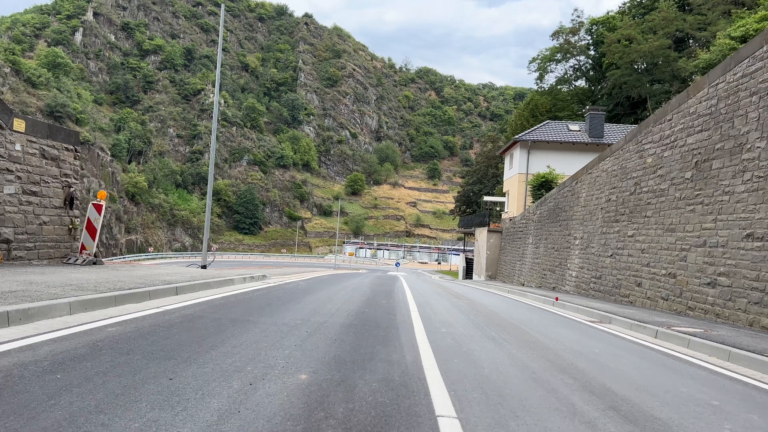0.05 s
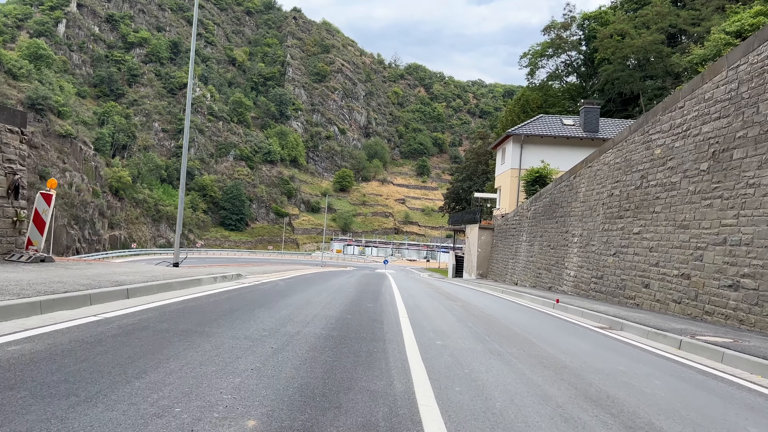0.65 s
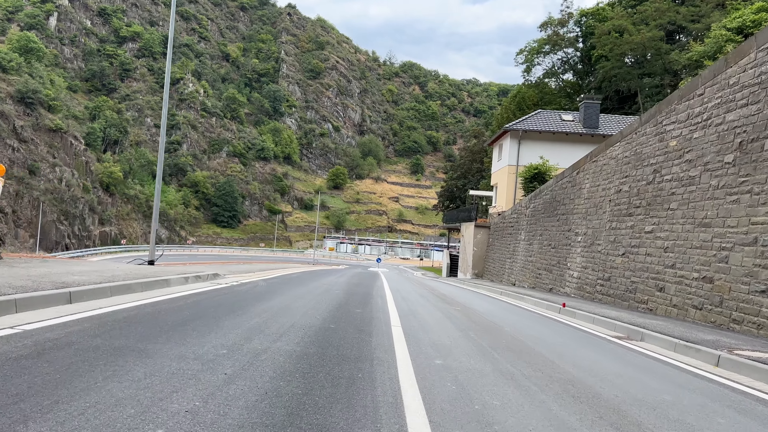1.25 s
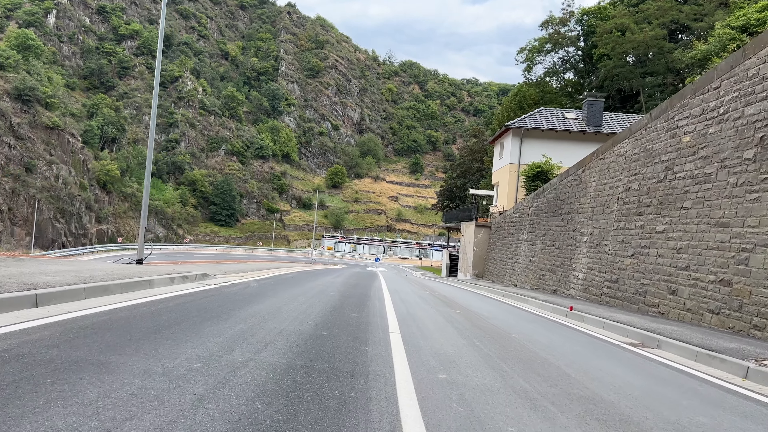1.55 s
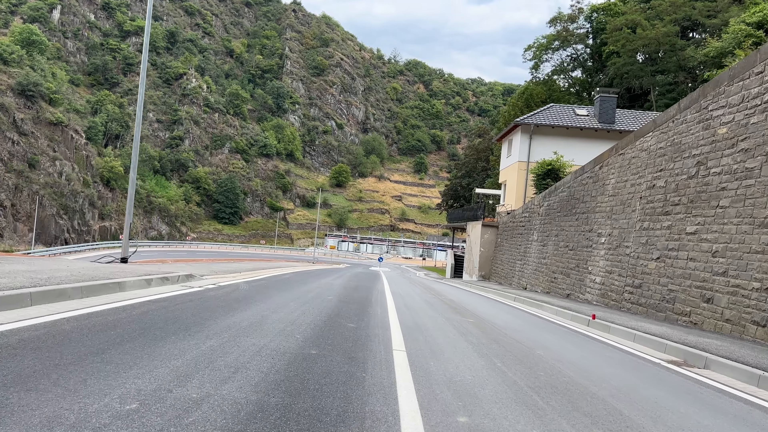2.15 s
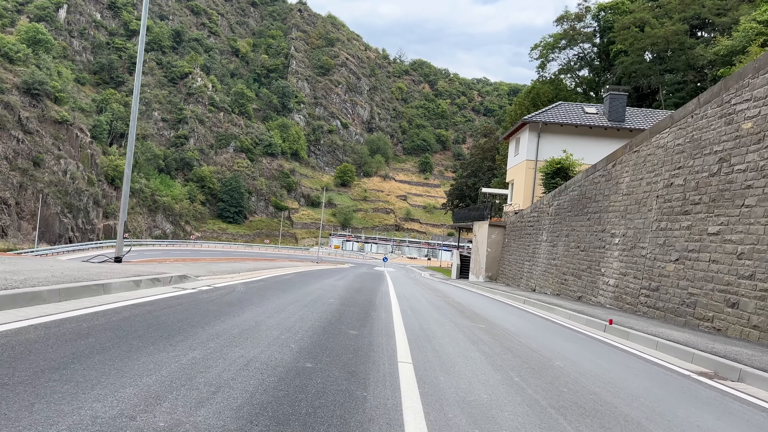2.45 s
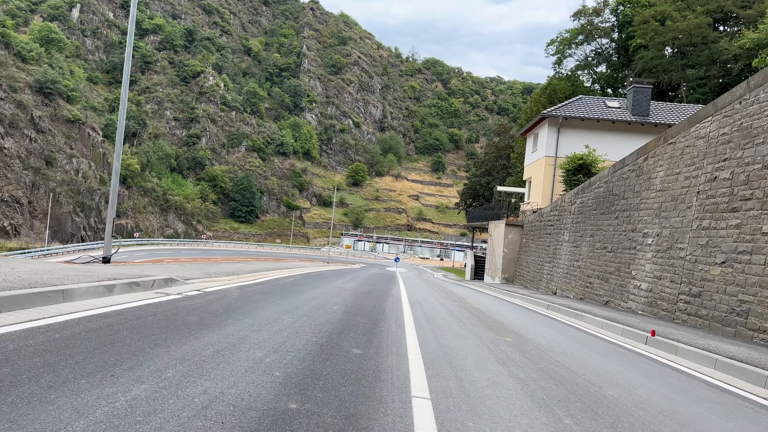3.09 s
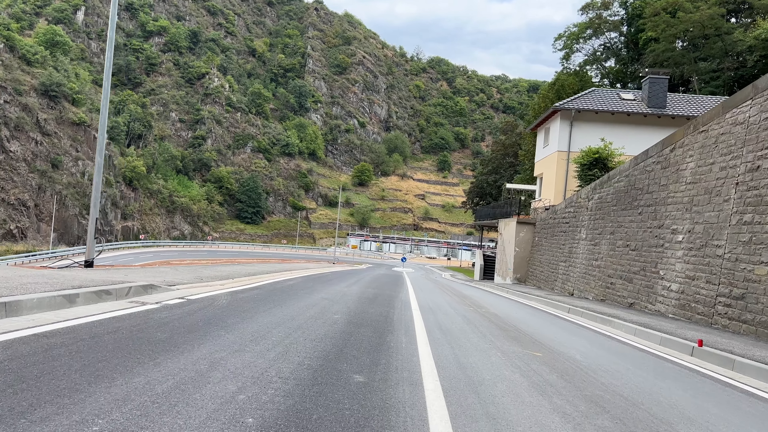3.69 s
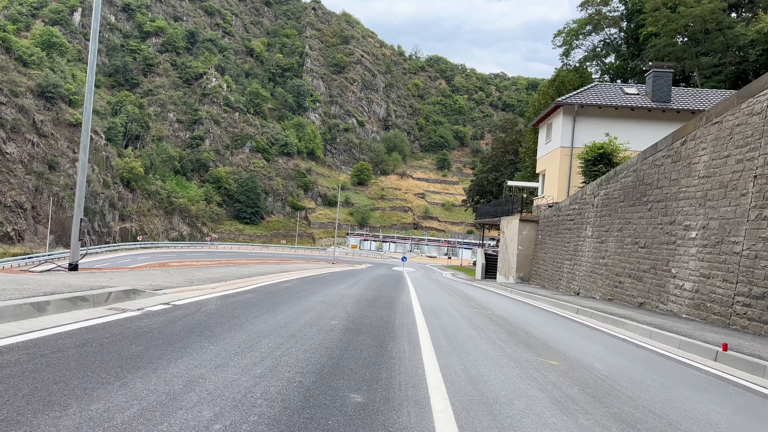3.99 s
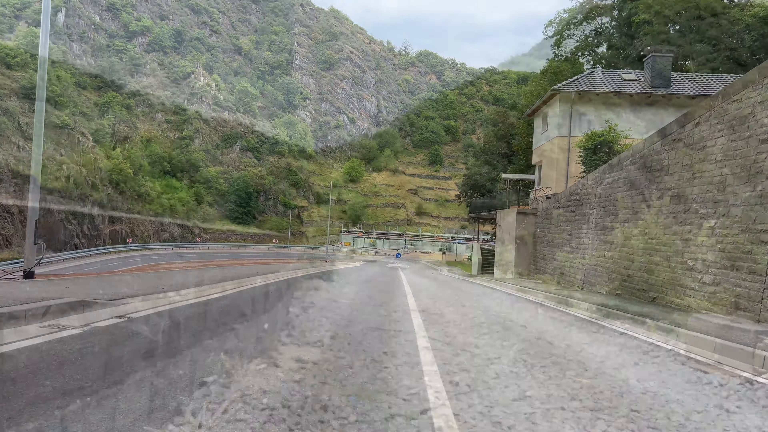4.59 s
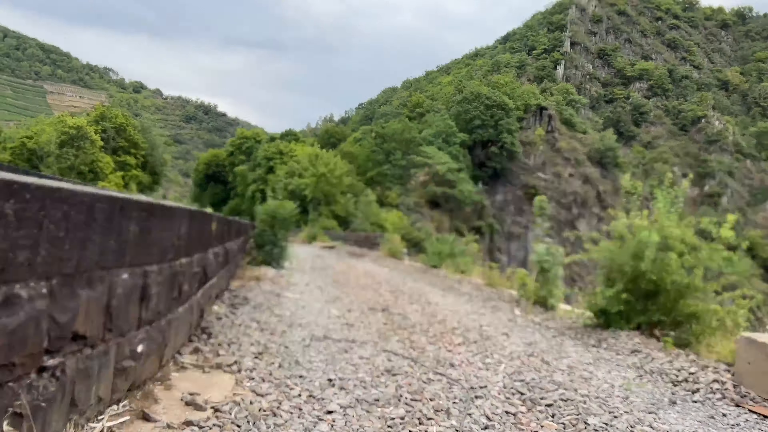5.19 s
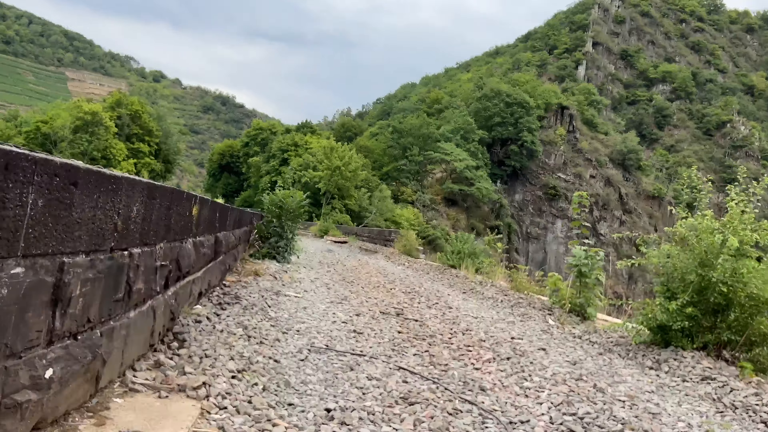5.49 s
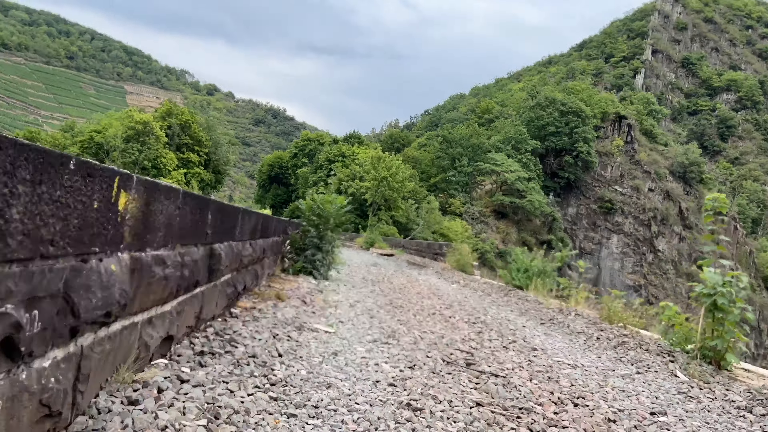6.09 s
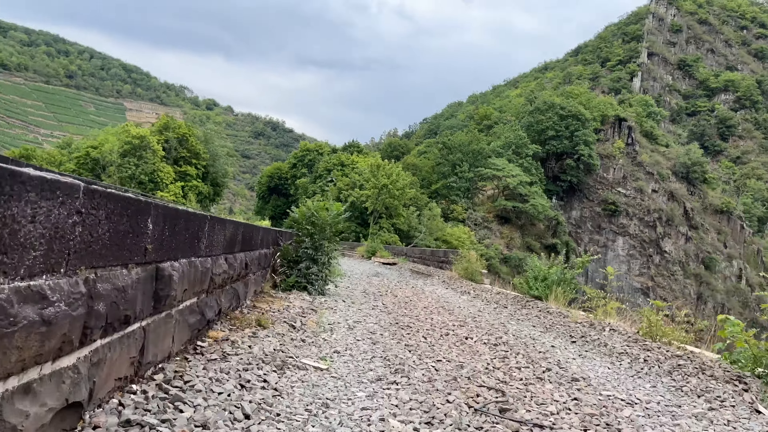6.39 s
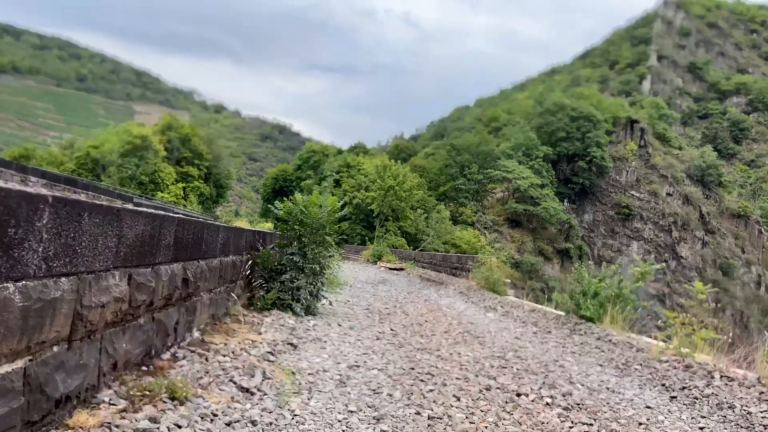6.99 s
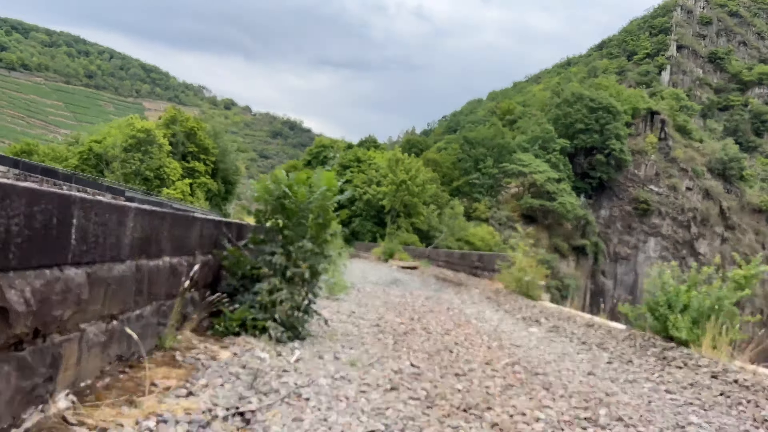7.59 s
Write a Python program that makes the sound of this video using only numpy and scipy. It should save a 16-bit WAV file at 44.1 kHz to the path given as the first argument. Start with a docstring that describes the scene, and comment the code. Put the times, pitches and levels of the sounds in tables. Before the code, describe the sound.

Bicycle tyres hum along a paved road with faint squeaks, then roll onto gravel where stones snap, clack and grind.

```python
"""Bicycle tyres crunch over gravel: stones slip, snap and clack, grit grinds, bumps jolt and ring the frame.
The gravel starts at 4.4 s. Before it the bicycle coasts on asphalt, slowly losing speed: the road
shakes the frame, the tread hums, the freewheel pawl buzzes and a dry bearing squeaks.
A camera with two microphone ports rides along; its body shades the right port in the treble."""
import sys
import numpy as np
from scipy import signal
from scipy.fft import rfft, irfft, next_fast_len
from scipy.io import wavfile

SR = 44100
rng = np.random.default_rng(int(sys.argv[2]) if len(sys.argv) > 2 else 0)


def dump(signal):
    """Clip the signal to [-1, 1] and save it as 16-bit WAV at the path in sys.argv[1]."""
    limited = np.clip(np.atleast_2d(signal).T, -1, 1)
    pcm = np.round(limited * 32767).astype(np.int16)
    wavfile.write(sys.argv[1], SR, pcm)


N = 346185
T = np.arange(N) / SR
TOP_HZ = 15850
GRAVEL_START_S, GRAVEL_RISE_S, ROAD_FADE_S = 4.41, 0.13, 0.8

# stones giving way: start_s, length_s, crack_db, knock_re_crack_db, spray_re_crack_db, top_re_crack_db
STONE_SLIDES = [(4.474, 0.014, -43, 2, 2.5, -13), (4.579, 0.0035, -47, -7, -15, -23.5),
                (4.608, 0.0032, -30.5, -12, -0.5, -21), (4.772, 0.0089, -39.5, -3, -4.5, -10),
                (4.825, 0.0074, -36.5, -14, -26, -33), (4.893, 0.0045, -30.5, -6, -27, -44),
                (4.933, 0.0089, -33.5, -13, -0.5, -26), (4.949, 0.0068, -24.5, -8.5, -8, -33),
                (4.975, 0.012, -29, -10, -8, -17), (5.202, 0.0054, -33, -2.5, -4.5, -33),
                (5.288, 0.013, -36, -11, 5, -16), (5.299, .016, -34.5, 0, 3, -24),
                (5.365, 0.0076, -46, -10, 11, -6), (5.411, 0.0095, -28.5, -7.5, -9, -18),
                (5.437, .013, -34.5, -16, 0, -6), (5.57, 0.0028, -36.5, 6.5, -1, 5),
                (5.707, 0.0033, -37, 5, -4, -13), (5.742, 0.012, -38, 8.5, -19, -5),
                (5.877, 0.019, -30, 2, -4, -5), (5.94, 0.0044, -44, -10, -20, -37),
                (5.979, 0.01, -36, -8, -4, -37), (6.012, 0.0049, -38, 1, -2, -25),
                (6.055, 0.011, -35, -3, 2.5, -4), (6.118, 0.0075, -33, 1.5, 4.5, -6),
                (6.256, 0.01, -35, -8, -5, -29), (6.526, 0.019, -32.5, -6.5, 9, -12),
                (6.645, 0.0047, -28.5, -18, -8, -35), (6.766, 0.0025, -27.5, -13, -8, -24),
                (6.776, 0.0076, -29, -7, -1, -13), (6.81, 0.004, -29, -7, -4, -12),
                (6.846, 0.012, -24, -12, -1.5, -29), (6.893, 0.0056, -25, -23, -26, -30),
                (6.898, 0.0078, -32, -10, -4, -30), (6.939, 0.0057, -38, 8, 7, 1),
                (7.008, 0.007, -31, -7, -10, -10), (7.03, 0.0038, -33, -6, 8.5, 6.5),
                (7.204, 0.0065, -36, -8, -3, -24), (7.257, 0.009, -33, 2.5, -6, -10),
                (7.266, .014, -24, -5, -1, -4), (7.316, 0.0042, -32, -13, -15, -5),
                (7.335, 0.013, -48.5, -9, 14, -16), (7.425, 0.0057, -26, -15, -14, -32),
                (7.443, 0.0041, -25, -14, -7, -18), (7.456, 0.0058, -35, 4, 2.5, -28),
                (7.534, .009, -36, 4, -6, -26), (7.574, 0.02, -36, -5, -10, -17),
                (7.625, 0.0056, -31.5, -1.5, -15, -31), (7.714, 0.0091, -33.5, -4.5, -5, -30),
                (7.727, 0.0044, -33, 1, 3, -8), (7.779, 0.0047, -28, -18, -11, -43),
                (7.817, 0.0052, -32.5, -12, 1, -24), (7.841, 0.0082, -28, -12, 2, -1)]
# slip bands (crack, knock, spray, top): low_hz, high_hz, ring_s, tail_db, level_db, port_correlation
SLIP_BANDS = [(855, 3340, 0.00079, -15.5, 0.5, 0.4), (193, 770, 0.0044, 2.5, 4.5, 0.57),
              (4330, 7240, 0.0021, -11.5, -2, 0.33), (6600, 13100, 0.0012, -8.5, -5, 0.1)]
# stone-on-stone blows: start_s, level_db, pitch_hz
STONE_CLACKS = [(4.474, -47, 2620), (4.571, -37, 1770), (4.609, -30, 3700), (4.775, -35, 3120),
                (4.888, -27, 2250), (4.901, -23, 1610), (4.932, -24, 5660), (4.95, -27, 3580),
                (4.9509, -20.5, 1545), (4.982, -23, 3220), (5.307, -21.5, 1350), (5.414, -29, 3350),
                (5.447, -27, 1480), (5.57, -26, 1070), (5.706, -30, 4800), (5.744, -19.5, 1226),
                (5.819, -33, 3000), (5.881, -15.5, 1400), (5.941, -28, 2300), (5.9814, -24.5, 1060),
                (5.986, -36, 3250), (6.012, -28.5, 3250), (6.063, -20.5, 2010), (6.123, -26, 2790),
                (6.227, -32, 4940), (6.242, -30, 4200), (6.263, -30, 4830), (6.292, -30, 5200),
                (6.318, -32, 3300), (6.391, -37, 5100), (6.529, -21, 1280), (6.534, -22, 6960),
                (6.538, -19, 7600), (6.564, -27, 1330), (6.6467, -29.5, 2870), (6.764, -21.5, 1360),
                (6.8472, -25, 3080), (6.856, -20, 5900), (6.903, -21.5, 4950), (6.9424, -18.5, 1160),
                (6.943, -27.5, 4600), (7.009, -26, 2700), (7.031, -20, 8460), (7.052, -29, 1580),
                (7.1013, -26.5, 1220), (7.187, -36, 3900), (7.21, -25.5, 5000), (7.2711, -12.5, 956),
                (7.295, -21.5, 1670), (7.369, -24.5, 1710), (7.433, -21, 2630), (7.5409, -22.5, 3450),
                (7.6378, -16.5, 2740), (7.654, -26.5, 1360), (7.779, -30, 3600), (7.8128, -21, 3220)]
# modes of a struck stone: pitch_ratio, level_db
CLACK_MODES = [(.63, -6), (.84, 2), (1, 14.5), (1.13, 5.5), (1.47, 3), (1.93, -16), (2.55, -29), (3.3, -25)]
# wheel bumps: start_s, level_db, pitch_hz, ring_s
BUMPS = [(2.769, -55, 45, 0.027), (3.972, -37, 59.5, 0.019), (4.291, -36, 115, 0.0084),
         (4.495, -28.5, 253, 0.0048), (5.019, -33, 190, 0.0042), (5.055, -26, 103, 0.0097),
         (5.106, -32, 150, 0.0055), (5.157, -18, 131, 0.0054), (5.185, -16, 201, 0.0038),
         (5.214, -25, 215, .006), (5.3, -21, 197, 0.008), (5.328, -16, 228, 0.0024),
         (5.347, -24, 180, 0.011), (5.462, -31, 92, 0.014), (5.574, -21, 336, 0.005),
         (5.589, -21.5, 158, 0.0062), (5.676, -17.5, 134, 0.0031), (5.748, -22, 590, 0.0067),
         (5.766, -26, 277, 0.0038), (5.83, -39, 53, .02), (5.892, -15, 442, 0.0041),
         (5.92, -14.5, 148, 0.0051), (6.013, -23.5, 245, 0.0053), (6.114, -23, 166, 0.012),
         (6.145, -17, 285, 0.0032), (6.222, -11.5, 228, 0.0024), (6.353, -15, 229.8, 0.0018),
         (6.423, -14.5, 124, 0.005), (6.433, -13, 295, 0.003), (6.459, -13.5, 156, 0.005),
         (6.546, -22, 55, 0.015), (6.564, -23, 111, 0.0096), (6.746, -27, 252, 0.0075),
         (6.93, -22, 404, 0.005), (7.001, -24, 245, 0.012), (7.12, -27, 324, .005),
         (7.273, -20, 740, 0.0028), (7.281, -21.5, 244, 0.014), (7.351, -23, 69.6, 0.011),
         (7.528, -19.5, 136, 0.0095), (7.58, -28.5, 155, 0.023), (7.673, -27, 131, 0.0056),
         (7.746, -23.5, 185, 0.015)]
# gravel bed: time_s, jolt_db, rattle_db, grit_db
GRAVEL_LEVELS = [(4.45, -60, -47.5, -44), (4.72, -47.5, -43.5, -45), (4.98, -34.5, -32.5, -44),
                 (5.12, -37, -34.5, -41.5), (5.29, -45, -29, -34.5), (5.52, -38.5, -35.5, -36.5),
                 (5.8, -35.5, -32.5, -38), (6.08, -34.5, -37, -34.5), (6.24, -34, -33.5, -33.5),
                 (6.35, -38, -40, -34), (6.45, -27.5, -32, -39.5), (6.55, -35, -33.5, -33),
                 (6.66, -42.5, -39, -36.5), (6.8, -39, -33, -40), (7.06, -35, -35.5, -31),
                 (7.38, -34.5, -32, -37), (7.62, -33.5, -32.5, -38), (7.85, -41.5, -34.5, -33.5)]
# jolt spectrum: freq_hz, gain_db
JOLT_EQ = [(20, -22), (35, 4), (58, 22.5), (90, 15), (140, 11.5), (250, -53), (800, -70)]
# grit spectrum: freq_hz, gain_db
GRIT_EQ = [(300, 1.5), (700, 11), (1050, 1.5), (1400, 6), (1900, -3), (2800, -1.5), (4000, -6), (6500, -8),
           (8900, -13.5), (10000, -63.5), (12000, -15.5), (15500, -71)]
# frame resonances rung by stones: freq_hz, width_hz, gain_db
RATTLE_MODES = [(129, 44, 6), (168.6, 65, 16.5), (235, 57, 9), (335, 120, -1), (446.6, 11.6, 12),
                (648, 23, -12), (675, 29, 14.5), (845, 17, -18), (1180, 16, 0), (1444, 23, -33),
                (1437, 15, -5), (1653, 66, 2.5), (1990, 50, -3), (2310, 31, -28)]
# sliding ring in the grinding: time_s, pitch_hz, level_db
SCRAPE_GLIDE = [(4.8, 1490, -70), (4.97, 1348, -50), (5.02, 1250, -39), (5.075, 1400, -30),
                (5.1, 1300, -38), (5.135, 1410, -33), (5.17, 1260, -37), (5.24, 1490, -43),
                (5.33, 1400, -51), (5.36, 1480, -37), (5.39, 1370, -34), (5.46, 1450, -47),
                (5.51, 1550, -35), (5.6, 1520, -44), (5.66, 1400, -35), (5.72, 1533, -33),
                (5.805, 1560, -28), (5.84, 1420, -33), (5.92, 1520, -39), (6.15, 1492, -36),
                (6.3, 1430, -37), (6.35, 1333, -40), (6.42, 1440, -39), (6.47, 1468, -35), (6.6, 1520, -37),
                (6.63, 1450, -40), (6.67, 1480, -40), (6.73, 1510, -37), (6.8, 1425, -39),
                (7.03, 1500, -38), (7.2, 1346, -44), (7.36, 1460, -34), (7.425, 1410, -32),
                (7.48, 1300, -55), (7.54, 1310, -31), (7.62, 1350, -44), (7.85, 1328, -34)]
# its partials: pitch_ratio, level_db
SCRAPE_PARTIALS = [(.83, -9), (1, -3.5), (1.46, -10.5), (1.65, -12)]
# asphalt, coarse then smooth: time_s, rumble_db, drone_db, hum_db
ASPHALT_LEVELS = [(0, -42.5, -42.5, -43), (.44, -46.5, -43.5, -64), (.55, -43, -44, -43),
                  (1.25, -51, -44, -42.5), (1.5, -46.5, -50, -45.5), (1.8, -47.5, -48, -46),
                  (2.4, -47, -48.5, -39.5), (2.9, -47, -44.5, -46.5), (3.15, -47.5, -46.5, -46.5),
                  (3.4, -37.5, -45.5, -48), (3.755, -40, -49, -38), (3.79, -52, -52, -52.5),
                  (4.2, -53, -55, -52), (4.5, -48, -51.5, -50)]
# road rumble spectrum: freq_hz, gain_db
RUMBLE_EQ = [(20, -4), (35, -7), (55, 9), (75, 6.5), (110, -1), (180, -38), (600, -72)]
# frame drone spectrum: freq_hz, gain_db
DRONE_EQ = [(70, -1), (120, 5.5), (190, 7), (250, -4.5), (330, -12.5), (600, -19.5), (2000, -70)]
# tyre hiss spectrum: freq_hz, gain_db
HISS_EQ = [(150, -0.5), (300, 8.5), (420, -2.5), (520, -9), (640, -4.5), (900, -0.5), (1500, -5.5),
           (2200, -1.5), (2800, -10), (4000, -12), (7000, -6.5), (8600, -8), (10000, -32), (11300, -3.5),
           (14000, -16.5), (15300, -8)]
# bicycle resonances driven by asphalt: freq_hz, width_hz, gain_db
ROLLING_MODES = [(460, 44, 4), (641, 66, 4), (721, 34, 5.5), (1100, 43, -0.5), (1294, 46, 0.5),
                 (1480, 140, -3), (1900, 58, 1), (2050, 25, 0), (2300, 29, -7), (3350, 39, -9)]
# tread partials, pattern repeating every second block: pitch_ratio, level_db
TREAD_PARTIALS = [(1, 0.5), (1.5, -14), (2, -16.5), (2.5, -20.5)]
# bearing squeaks: centre_s, level_db
BEARING_SQUEAKS = [(0.084, -45), (1.207, -44.5), (2.37, -44.5), (3.583, -45)]
# squeak harmonics: pitch_ratio, level_db
SQUEAK_PARTIALS = [(1, -6), (2, -6.5), (3, 0.5), (4, -3.5), (5, -12)]
# freewheel pawl clicks: time_s, rate_hz
PAWL_RATE = [(0, 136), (.5, 100), (1.3, 140), (1.8, 87), (4.1, 97), (5.3, 140)]
# hub resonances: freq_hz, width_hz, gain_db
HUB_RESONANCES = [(3300, 57, -8.5), (3550, 41, -7.5), (3830, 63, -6), (4570, 120, -2.5), (4750, 70, -0.5),
                  (5050, 210, 0.5), (5410, 100, -1), (5795, 170, 2), (6200, 62, -2), (6560, 130, 0),
                  (7820, 67, 0), (8540, 69, -0.5), (9055, 133, 5.5)]
# tyre whines: centre_s, half_length_s, pitch_hz, level_db
TYRE_WHINES = [(0.48, 0.19, 601, -66), (0.836, 0.13, 580, -65.5), (0.961, 0.091, 765, -59.5),
               (1.451, .15, 616, -73), (1.733, 0.12, 577, -61), (2.03, 0.15, 550, -69),
               (2.881, 0.12, 545, -63), (3.752, .16, 636, -66)]
# port likeness on gravel: freq_hz, correlation
GRAVEL_CORRELATION = [(35, 0.46), (70, 0.27), (200, 0.23), (700, 0.072), (1350, 0.59), (2400, 0.092),
                      (4400, 0.012), (8000, 0.12), (15000, 0.35)]
# port likeness on asphalt: freq_hz, correlation
ROAD_CORRELATION = [(60, 0.57), (200, 1), (400, 0.67), (700, 0.098), (1300, 0.5), (2400, 0.034),
                    (4400, -0.21), (8000, 0.12), (15000, 0.32)]
# camera body shadow: freq_hz, left_minus_right_db
PORT_SHADE = [(200, 0), (700, -1), (1300, 1.5), (2200, 1), (3200, 3.5), (4400, 8), (6500, 12.5), (7800, 8),
              (8900, 1.5), (10000, 0)]


def stones(slip_rate_hz=600, tail_s=0.013, tail_per_slide=0.32, uneven_db=1.5, neighbours=3, size=4096):
    """A stone gives way in quick slips, each ringing a neighbour; longer slides trail more loose grit."""
    out = np.zeros((2, N + size))
    t = np.arange(size) / SR
    for start_s, length_s, crack_db, *relative_db in STONE_SLIDES:
        place, force = rng.beta(2, 2, 32), rng.standard_normal(32)  # slips crowd mid-run
        place[0], force[0] = 0, 1  # firm first break
        slips = int(np.clip(1 + length_s * slip_rate_hz, 1, 32))
        at = (place[:slips] * length_s * SR).astype(int)
        strength = undb(uneven_db * force[:slips])
        runs = np.array([np.bincount(at[k::neighbours], strength[k::neighbours], size)
                         for k in range(neighbours)])
        tail = np.exp(-t / (tail_s + tail_per_slide * length_s))
        start = int(start_s * SR)
        for band, rel_db in zip(SLIP_BANDS, [0, *relative_db]):
            low_hz, high_hz, ring_s, tail_db, band_db, correlation = band
            body = rng.standard_normal((2, neighbours, size)) * (np.exp(-t / ring_s) + undb(tail_db) * tail)
            slide = signal.fftconvolve(runs[None], body, axes=2).sum(axis=1)[:, :size]
            slide = bandpass(slide, 3, low_hz, high_hz)
            mid, side = slide * np.sqrt(length_s * SR / np.sum(slide ** 2, axis=1, keepdims=True))
            side *= np.sqrt((1 - correlation) / (1 + correlation))
            gain = undb(crack_db + rel_db + band_db)
            out[:, start:start + size] += gain * np.array([mid + side, mid - side])
    return out[:, :N]


def clacks(ring_cycles=3.8, port_spread=0.46, dull_hz=9500, scatter_db=-27, scatter_s=0.0043, size=2048):
    """A struck stone rings for a few cycles; the stones around it scatter the sound."""
    out = np.zeros((2, N + size))
    t = np.arange(size) / SR
    ratios, mode_db = np.transpose(CLACK_MODES)
    for start_s, level_db, pitch_hz in STONE_CLACKS:
        modes_hz = pitch_hz * ratios * (1 + 0.036 * rng.standard_normal(len(ratios)))
        rolloff = (modes_hz < TOP_HZ) / np.hypot(1, (modes_hz / dull_hz) ** 4)
        strength = undb(mode_db) * rolloff * rng.choice([-1, 1], len(ratios))
        port_gains = strength * (1 + port_spread * np.outer([1, -1], rng.standard_normal(len(ratios))))
        decay = np.exp(-np.outer(np.sqrt(modes_hz * pitch_hz), t) / ring_cycles)
        click = port_gains @ (np.sin(2 * np.pi * np.outer(modes_hz, t)) * decay)
        scatter = bandpass(rng.standard_normal((2, size)), 2, pitch_hz / 2, 3 * pitch_hz)
        click += undb(scatter_db) * scatter / scatter.std() * np.exp(-t / scatter_s)
        click *= np.sqrt(0.0014 * SR / np.sum(click.mean(0) ** 2))  # energy of 1.4 ms at rms 1
        start = int(start_s * SR)
        out[:, start:start + size] += undb(level_db) * click
    return out[:, :N]


def thumps(contact_s=0.0034, left_lag_s=0.00016, knock_ratio=2.55, knock_db=-8, knock_s=0.0036):
    """The tyre cushions a bump, the wheel swings briefly and the frame knocks."""
    out = np.zeros((2, N))
    for start_s, level_db, pitch_hz, ring_s in BUMPS:
        start = int(start_s * SR)
        size = min(8192, N - start)
        t = np.maximum(T[:size] - np.array([[left_lag_s], [0]]), 0)
        swing = np.sin(2 * np.pi * pitch_hz * t) * np.exp(-t / ring_s)
        knock = undb(knock_db) * np.sin(2 * np.pi * knock_ratio * pitch_hz * t) * np.exp(-t / knock_s)
        cushion = 1 - np.exp(-t / contact_s)
        out[:, start:start + size] += 2 * undb(level_db) * (swing + knock) * cushion
    return out


def gravel(jolt_db=-1, rattle_db=-1, grit_db=-2, pebble_db=-10, shake_db=-17, spill_db=-15):
    """The gravel bed jolts the bicycle and rattles its frame; grit grinds in patches, pebbles click."""
    jolt, rattle, grit = undb(curves(GRAVEL_LEVELS))
    # bumps shake the frame; grit shifts around each sliding stone
    shake = swells([(s, db + shake_db) for s, db, *_ in BUMPS], rise_s=0.006, fall_s=0.022)
    spill = swells([(s, db + spill_db) for s, _, db, *_ in STONE_SLIDES], rise_s=0.01, fall_s=0.024)
    tyre_load = undb(0.68 * walk(28))
    rattle = np.hypot(rattle, shake) * tyre_load
    grit = np.hypot(grit, spill) * tyre_load
    jolts = ports(eq(noise(), JOLT_EQ), GRAVEL_CORRELATION) * jolt * undb(jolt_db + 2 * walk(8.9))
    frame = frame_rattle() * rattle * undb(rattle_db)
    crunch = grit_grains() * undb(grit_db + 1.5 * walk(45))
    clicks = pebbles() * undb(pebble_db)
    return jolts + frame + grit * (crunch + clicks + sand()) + scrape()


def frame_rattle(grind_db=-1):
    """Stones ring the frame: the tyre dulls single blows, steady grinding feeds the higher modes."""
    blows = contacts(rate_hz=430, spread_db=1, ring_s=0.00019)
    knocks = eq(blows / blows.std(), [(600, 1.5), (1300, -41), (4000, -38)])
    grinding = eq(noise(), [(300, -13), (1100, 0), (2300, -3), (4500, -8)])
    grinding *= undb(grind_db + 2 * walk(30))
    return ports(ring(knocks + grinding, RATTLE_MODES), GRAVEL_CORRELATION)


def grit_grains(rate_hz=1100, spread_db=3, ring_s=0.0035, band_ratio=1.47, bands=40, size=512):
    """Grit of many sizes is ground together; each size ticks in its own band."""
    out = np.zeros((2, N))
    decay = np.exp(-np.arange(size) / SR / ring_s)
    for hz in np.geomspace(450, 12000, bands):
        hits = impacts(rate_hz / bands, spread_db, max_hardness=3.5)
        grain = bandpass(rng.standard_normal((2, size)) * decay, 1, hz / band_ratio, hz * band_ratio)
        out += signal.oaconvolve(hits[None], grain, axes=1)[:, :N]
    return ports(eq(out, GRIT_EQ), GRAVEL_CORRELATION)


def scrape(gain_db=-6.5, waver=0.01199, roughness=0.02402, flicker_db=6.5):
    """The grinding rings in tones that slide together and flicker one by one."""
    pitch_hz, level_db = curves(SCRAPE_GLIDE)
    bend = 1 + waver * walk(20)
    return sum(np.sin(phase(ratio * pitch_hz * (bend + roughness * walk(150))))
               * undb(gain_db + level_db + db + flicker_db * walk(19)) for ratio, db in SCRAPE_PARTIALS)


def pebbles(low_hz=1500, high_hz=5800, ring_cycles=7.3, spread_db=8.5, tilt_db=-1, gap_s=0.005, size=512):
    """Small stones jostle in clusters of four clicks, each with its own short-lived modes."""
    out = np.zeros((2, N + size))
    t = np.arange(size) / SR
    for place, chance in rng.random((190, 2)):
        starts = (place * N + np.cumsum(rng.exponential(size=4)) * gap_s * SR).astype(int) % N
        cluster_db = spread_db * min(-np.log(1 - chance), 2)
        for start in starts:
            height = rng.random()
            pitch_hz = low_hz * (high_hz / low_hz) ** height
            modes_hz = pitch_hz * 4 ** rng.uniform(-0.5, 0.5, 8)
            port_gains = rng.uniform(-0.5, 0.5, (2, 8))
            decay = np.exp(-t * pitch_hz / ring_cycles)
            click = port_gains @ np.sin(2 * np.pi * np.outer(modes_hz, t)) * decay
            out[:, start:start + size] += undb(cluster_db + tilt_db * height) * click
    return ports(eq(out[:, :N], [(7500, 23), (10000, -41)]), GRAVEL_CORRELATION)


def sand(gain_db=-27, patchy_db=5):
    """Fine sand is crushed with a thin, patchy fizz."""
    grains = contacts(rate_hz=2100, spread_db=9, ring_s=0.0004)
    fizz = eq(grains, [(5000, -30), (8500, -3), (12000, -26), (15500, 14)])
    return ports(fizz, GRAVEL_CORRELATION) * undb(gain_db - patchy_db * walk(12))


def asphalt(hiss_db=-52.5, ring_db=-56):
    """Road texture shakes and rings the frame and hisses under the tyres."""
    rumble_db, drone_db, _ = curves(ASPHALT_LEVELS)
    rumble = ports(eq(noise(), RUMBLE_EQ), ROAD_CORRELATION) * undb(rumble_db)
    drone = ports(eq(noise(), DRONE_EQ), ROAD_CORRELATION) * undb(drone_db + 0.8 * walk(12))
    hiss = ports(eq(noise(), HISS_EQ), ROAD_CORRELATION) * undb(hiss_db + 0.66 * walk(16))
    ringing = ports(ring(noise(), ROLLING_MODES), ROAD_CORRELATION) * undb(ring_db + walk(5))
    return rumble + drone + hiss + ringing


def tyre_hum(start_hz=102.8, sag_hz_per_s=2.95, waver=0.0022, flutter_db=0.4):
    """The tread drums on the asphalt; the pitch sinks with the speed."""
    *_, hum_db = curves(ASPHALT_LEVELS)
    angle = phase((start_hz - sag_hz_per_s * T) * (1 + waver * walk(7.34)))
    tones = sum(np.sin(ratio * angle) * undb(db) for ratio, db in TREAD_PARTIALS)
    return np.sqrt(2) * tones * undb(hum_db - flutter_db * walk(7.2))


def squeak(pitch_hz=559, half_length_s=0.011, edge_s=0.0045, sag_hz_per_s=600, rasp=0.018, chatter_db=2):
    """A dry bearing catches, chatters and sags in pitch, less often as the bicycle slows."""
    out = np.zeros(N)
    jitter = rasp * walk(400)
    partials = [(ratio, undb(db + chatter_db * walk(220))) for ratio, db in SQUEAK_PARTIALS]
    for centre_s, level_db in BEARING_SQUEAKS:
        near = abs(T - centre_s) < 0.05
        t = T[near] - centre_s
        angle = phase(pitch_hz * (1 + jitter[near]) - sag_hz_per_s * t)
        grip = 0.5 + 0.5 * np.tanh((half_length_s - abs(t)) / edge_s)
        out[near] += undb(level_db) * grip * sum(np.sin(k * angle) * gain[near] for k, gain in partials)
    return out


def freewheel(level_db=-54.5, ring_s=0.0066, uneven_db=0.5, wander_db=0.96):
    """A pawl drops off each ratchet tooth and rings the hub."""
    rate_hz, = curves(PAWL_RATE)
    teeth = np.cumsum(rate_hz) / SR
    force = undb(uneven_db * rng.standard_normal(2048))[teeth.astype(int)]
    drops = noise() * force * np.exp(-(teeth % 1) / rate_hz / ring_s)
    hub = eq(ring(drops, HUB_RESONANCES), [(2300, -18), (3300, 5), (4300, 6), (9100, 0.5), (9800, -40)])
    return ports(hub, ROAD_CORRELATION) * undb(level_db + wander_db * walk(8.8))


def whines(sag_hz_per_s=30, waver=0.0016):
    """Faint tyre tones swell and fade, each sinking a little."""
    out = np.zeros(N)
    bend = 1 + waver * walk(11.4)
    for centre_s, half_length_s, pitch_hz, level_db in TYRE_WHINES:
        t = T - centre_s
        swell = np.sqrt(2) * undb(level_db) * np.exp(-(t / half_length_s) ** 2)
        out += swell * np.sin(phase((pitch_hz - sag_hz_per_s * t) * bend))
    return out


def contacts(rate_hz, spread_db, ring_s, stone_count=12):
    """A shower of contacts among stones, each stone with its own short ring."""
    out = np.zeros((2, N))
    decay = np.exp(-np.arange(512) / SR / ring_s)
    for _ in range(stone_count):
        hits = impacts(rate_hz / stone_count, spread_db, max_hardness=4)
        stone = rng.standard_normal((2, len(decay))) * decay
        out += signal.oaconvolve(hits[None], stone, axes=1)[:, :N]
    return out


def impacts(rate_hz, spread_db, max_hardness):
    """Randomly timed impulses, a few harder than the rest."""
    count = int(rate_hz * N / SR)
    hardness = np.minimum(rng.exponential(size=count), max_hardness)
    return np.bincount(rng.integers(0, N, count), undb(spread_db * hardness), N)


def swells(events, rise_s, fall_s):
    """Envelope rising to each (time_s, level_db) event and dying away."""
    return sum(undb(db) * np.exp(-np.maximum((s - T) / rise_s, (T - s) / fall_s)) for s, db in events)


def undb(db):
    return 10 ** (np.asarray(db) / 20)


def phase(hz):
    return 2 * np.pi * np.cumsum(hz) / SR


def noise():
    return rng.standard_normal((2, N))


def walk(rate_hz):
    """Random drift, spread near 1."""
    return np.interp(T * rate_hz, np.arange(4096), rng.standard_normal(4096))


def curves(table):
    """Columns of a time table, one value a sample."""
    time_s, *columns = np.transpose(table)
    return [np.interp(T, time_s, column) for column in columns]


def per_bin(points, size):
    """(freq_hz, value) points joined on a log axis, one value an FFT bin."""
    hz, value = np.transpose(points)
    return np.interp(np.log(np.fft.rfftfreq(size, 1 / SR) + 1), np.log(hz), value)


def fft_filter(x, gain_of_size):
    size = next_fast_len(N + 4096, real=True)
    return irfft(rfft(x, size) * gain_of_size(size), size)[..., :N]


def eq(x, points):
    """Filter by (freq_hz, gain_db) points."""
    return fft_filter(x, lambda size: undb(per_bin(points, size)))


def bandpass(x, order, low_hz, high_hz):
    sos = signal.butter(order, [low_hz, min(high_hz, TOP_HZ)], "band", fs=SR, output="sos")
    return signal.sosfilt(sos, x)


def ring(x, modes):
    """Parallel resonances (freq_hz, width_hz, gain_db)."""
    return sum(undb(db) * signal.lfilter(*signal.iirpeak(hz, hz / width_hz, SR), x)
               for hz, width_hz, db in modes)


def ports(pair, correlation):
    """Mix two unrelated signals to correlated left and right; their mean has rms 1."""
    def weights(size):
        c = np.clip(per_bin(correlation, size), -0.98, 0.98)
        return np.sqrt([1 + c, 1 - c])
    mid, side = fft_filter(pair, weights)
    return np.array([mid + side, mid - side]) / mid.std()


def scene():
    """The asphalt fades out as the gravel takes over."""
    road_gain = np.clip(1 - (T - GRAVEL_START_S) / ROAD_FADE_S, 0, 1)
    gravel_gain = np.clip((T - GRAVEL_START_S) / GRAVEL_RISE_S, 0, 1)
    road = asphalt() + tyre_hum() + whines() + freewheel() + squeak()
    return road * road_gain + gravel() * gravel_gain + thumps() + stones() + clacks()


def record(dry):
    """The camera body shades the right port; steep low-pass at TOP_HZ."""
    def shade(size):
        gains = undb(np.outer([0.5, -0.5], per_bin(PORT_SHADE, size)))
        return gains / np.sqrt(np.mean(gains ** 2, axis=0))
    lowpass = signal.ellip(10, 0.2, 80, TOP_HZ, fs=SR, output="sos")
    return signal.sosfilt(lowpass, fft_filter(dry, shade))


dry = scene()
out = record(dry)
dump(out)
```